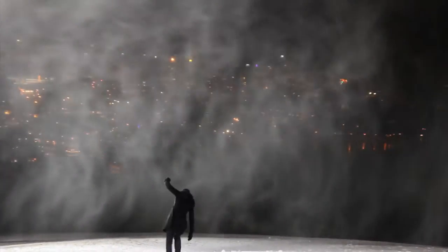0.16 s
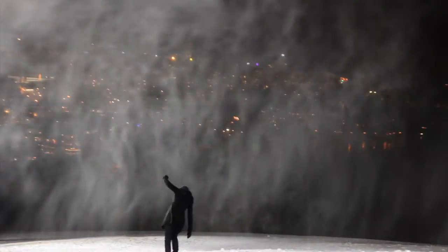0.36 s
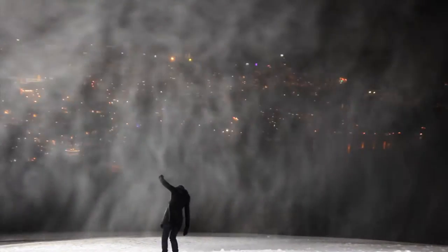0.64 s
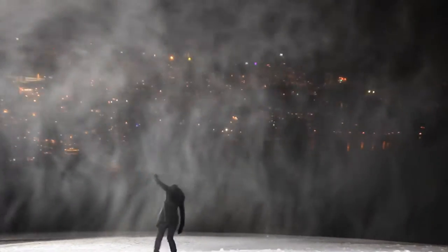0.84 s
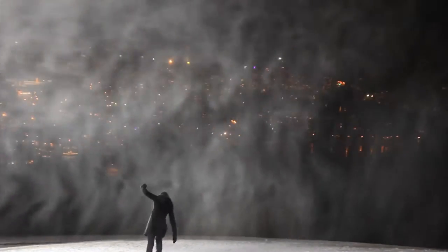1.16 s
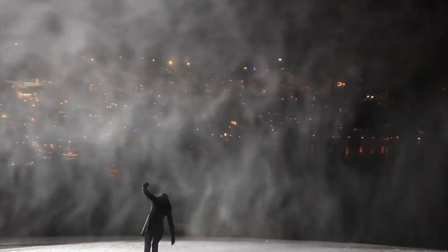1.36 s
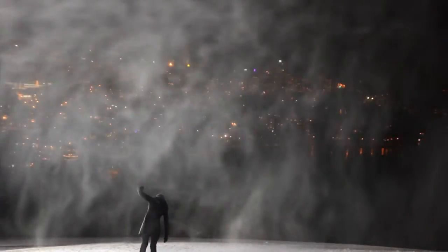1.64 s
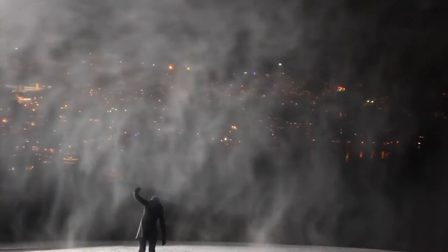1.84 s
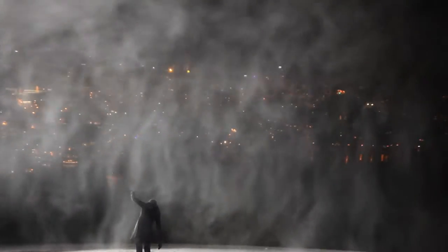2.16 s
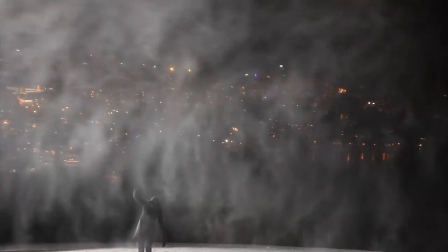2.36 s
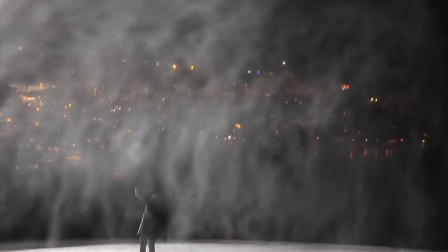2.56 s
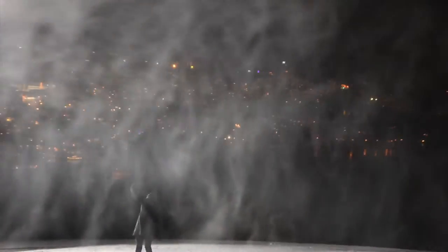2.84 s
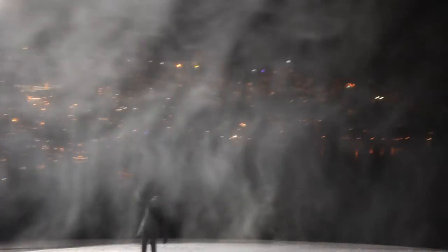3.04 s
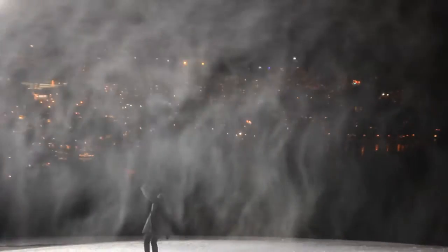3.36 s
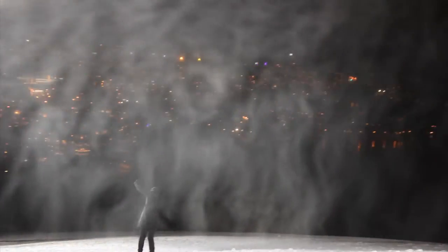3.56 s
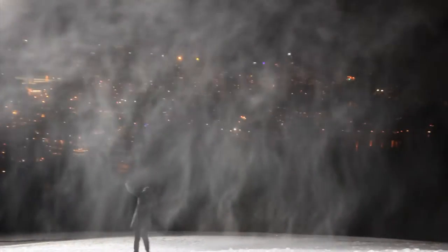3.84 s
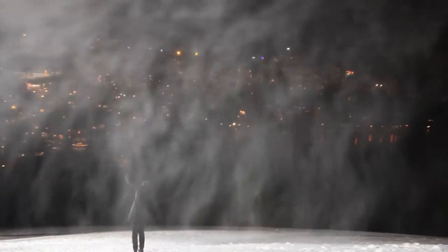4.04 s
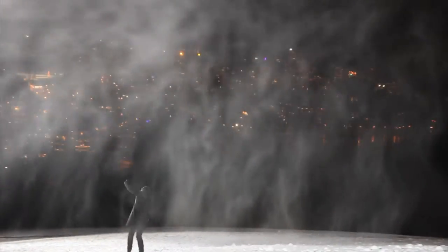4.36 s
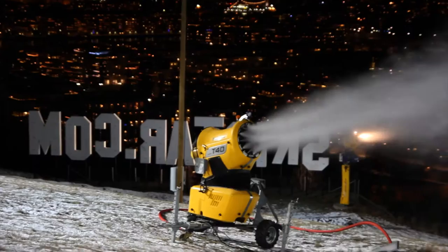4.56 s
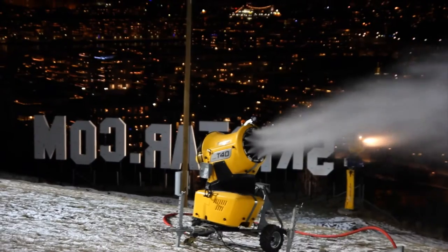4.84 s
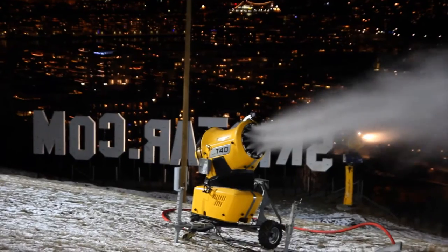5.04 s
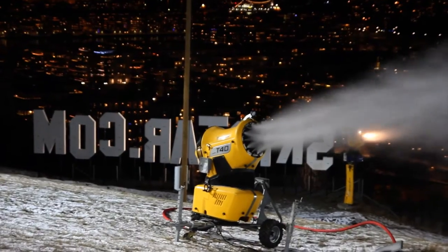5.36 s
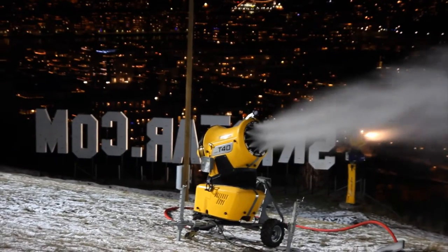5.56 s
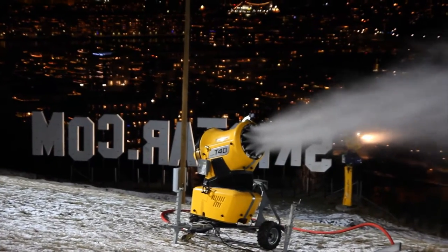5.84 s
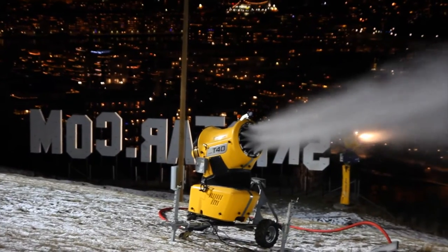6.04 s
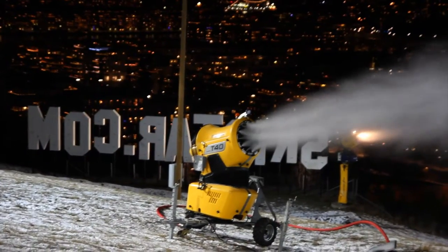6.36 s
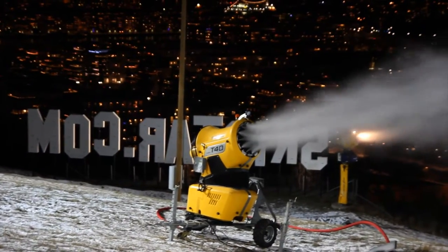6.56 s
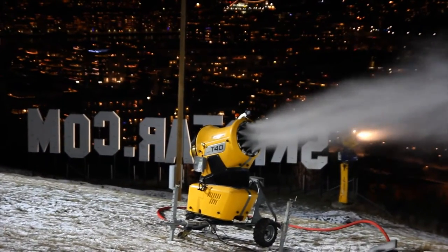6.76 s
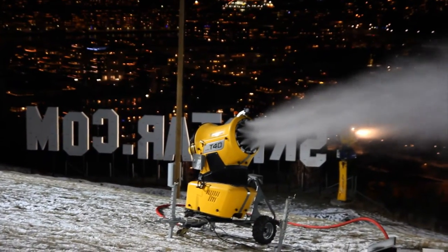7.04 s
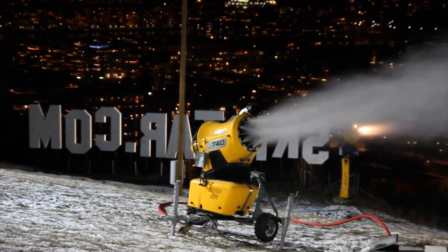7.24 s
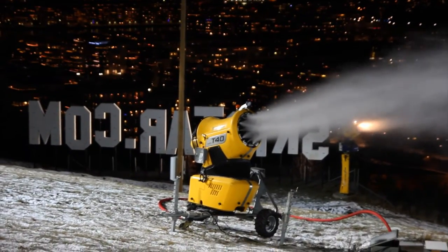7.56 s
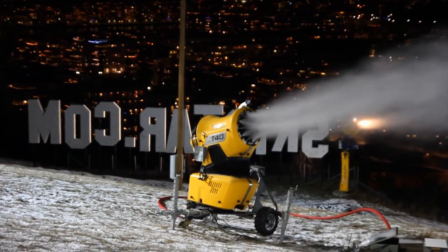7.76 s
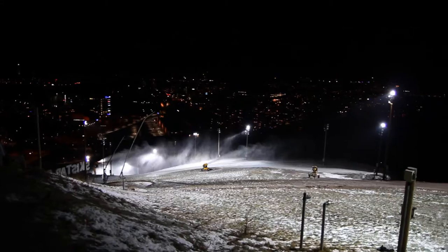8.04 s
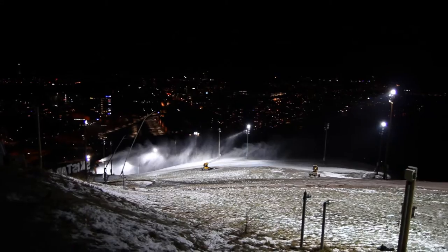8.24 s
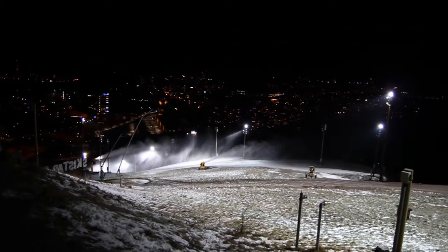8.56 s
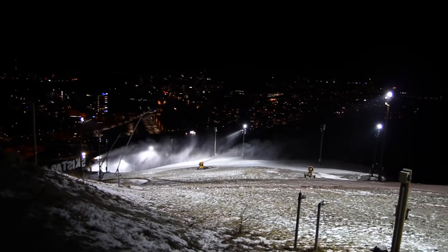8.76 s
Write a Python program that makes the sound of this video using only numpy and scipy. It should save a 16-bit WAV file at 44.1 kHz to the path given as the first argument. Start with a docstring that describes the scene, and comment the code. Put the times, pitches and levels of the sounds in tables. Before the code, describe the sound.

Outdoors at night on a ski slope, the microphone sits inside a snow cannon's plume: dense jet roar, bright nozzle hiss, low fan hum and a soft swelling breeze. Near five seconds it moves beside the cannon, where the spray is quieter and rough gusts slap and overload the microphone. Just after eight seconds it cuts to a distant, wind-free, duller spray with steady fan tones.

```python
"""Snow cannons heard by one microphone: inside the plume, then beside a cannon, then far across the slope.
In the plume, shaped noise makes jet roar and nozzle hiss, sines make two fans and thin hums, a breeze blows.
From 4.62 s this crossfades to the cannon's side, where gusts of noise and sharp slaps buffet the microphone.
At 8.108 s the far place follows at once: duller spray and the fans' blade tones, sheltered from the wind."""
import sys
import numpy as np
from scipy import signal
from scipy.fft import rfft, irfft
from scipy.io import wavfile
from scipy.ndimage import uniform_filter1d

SR = 44100
rng = np.random.default_rng(int(sys.argv[2]) if len(sys.argv) > 2 else 0)


def output_pcm(signal):
    """Save a mono or channel-first signal as 16-bit PCM at the path in sys.argv[1].

    Samples are clipped to [-1, 1] before scaling.
    """
    pcm = np.clip(np.atleast_2d(signal).T, -1, 1) * 32767
    wavfile.write(sys.argv[1], SR, np.round(pcm).astype(np.int16))


N = 392490
SIZE, HOP = 1024, 256  # spectral frame length and step [samples]
HZ = np.fft.rfftfreq(SIZE, 1 / SR)
FRAMES = np.arange(N // HOP + 5) * HOP / SR  # frame times [s]
TIME = np.arange(N) / SR
FADE = (4.62, 5.15)  # start and end of the crossfade from plume to cannon side [s]
JUMP = 8.108  # the far place follows at once [s]


def gain_of(db):
    """Logarithmic level law: decibels to amplitude."""
    return 10 ** (np.asarray(db) / 20)


def evened(x):
    """Normalisation by the root mean square: scales to rms 1."""
    return x / np.sqrt(np.mean(x ** 2) + 1e-20)


def read(points, hz):
    """Spectral interpolation: reads a spectrum on a log-frequency axis."""
    f, value = np.transpose(points)
    return np.interp(np.log(hz + 1), np.log(f + 1), value)


def band_power(gain, lo_hz, hi_hz):
    """Additivity of power: sums a frames x bins magnitude, squared, between two frequencies."""
    inside = (HZ > lo_hz) & (HZ < hi_hz)
    return (gain[:, inside] ** 2).sum(1, keepdims=True)


def grid_chance():
    """Gaussian randomness: an independent draw for every frame and bin."""
    return rng.standard_normal((len(FRAMES), len(HZ)))


def patches(frames, bins):
    """Local averaging: a random field of rms 1, smoothed over neighbouring frames and bins."""
    smooth_in_time = uniform_filter1d(grid_chance(), size=frames, axis=0)
    return evened(uniform_filter1d(smooth_in_time, size=bins, axis=1))


def noise(gain):
    """Overlap-add synthesis: noise whose power is the summed squares of the frames x bins magnitude."""
    spectrum = (grid_chance() + 1j * grid_chance()) * gain
    sound = signal.istft(spectrum.T, nperseg=SIZE, noverlap=SIZE - HOP)[1][:N]
    return sound * np.sqrt(3 / 2)  # overlapping independent frames divide the power by 1.5


def wander(hz):
    """Gaussian low-pass filtering: smooth chance of rms 1 that changes about hz times a second."""
    steps = np.arange(N // 64 + 2) * 64 / SR
    f = np.fft.rfftfreq(len(steps), steps[1])
    spectrum = rfft(rng.standard_normal(len(steps))) * np.exp(-(f / hz) ** 2)
    return np.interp(TIME, steps, evened(irfft(spectrum, len(steps))))


# even low rumble: (frequency [Hz], relative density [dB per Hz])
RUMBLE_SPECTRUM = [(15, -32), (30, -19), (60, -3), (100, 3), (180, -12), (300, -30), (600, -47)]
RUMBLE_DB = (-35, -34.5)  # level at the first two places


def rumble():
    """Stationary random noise: an even low rumble under the wind."""
    level_db = np.interp(TIME, FADE, RUMBLE_DB)
    return evened(noise(gain_of(read(RUMBLE_SPECTRUM, HZ))[None])) * gain_of(level_db)


# swelling and sinking breeze on the microphone inside the plume: (time [s], level [dB])
BREEZE = [(0.0, -29), (0.18, -18.5), (0.71, -23.5), (1.42, -18.5), (1.66, -24.5), (1.76, -20), (3.02, -22),
          (3.13, -35), (3.21, -22), (3.33, -30.5), (3.86, -21.5), (4.04, -30), (4.59, -20), (4.72, -23.5)]
BREEZE_ENDS_S = 4.79
# separate gusts beside the cannon: (start [s], end [s], first level [dB], last level [dB],
# brightness [dB per octave just above the hump of the wind])
GUSTS = [(4.815, 4.985, -24.5, -19, 11), (5.023, 5.07, -19, -20.5, 3), (5.1, 5.398, -21, -16, 12),
         (5.418, 5.557, -19.5, -20.5, 7), (5.586, 5.77, -22.5, -12.5, 4.5), (5.814, 5.937, -22.5, -14, 6),
         (5.944, 6.09, -15.5, -18, 4), (6.17, 6.227, -19, -16, 8), (6.264, 6.276, -14, -12, 5),
         (6.302, 6.426, -14.5, -20, 7.5), (6.43, 6.654, -12, -22, 9), (6.657, 7.003, -17.5, -19, 11.5),
         (7.034, 7.063, -15, -18, 6), (7.091, 7.216, -17, -32, 4), (7.287, 7.32, -16, -9, 6),
         (7.355, 7.378, -19, -22, 1), (7.475, 7.58, -24, -9, 2), (7.633, 7.654, -11.5, -19, 0),
         (7.723, 7.755, -17, -25, 0), (7.811, 7.908, -19, -18.5, 4), (7.93, 7.966, -12, -14, 3),
         (7.982, 8.032, -15, -13, 6.5), (8.076, 8.115, -17, -16.5, 10)]
RISE_S, FALL_S = .01, .014  # edges of a gust
CALM_DB = -27.5  # the air between gusts


def strength(t):
    """Intermittency of turbulence: wind dB of a breeze, then gusts that rise fast, swell or sag, and calm."""
    amp = gain_of(np.interp(t, *np.transpose(BREEZE)))
    amp = amp * np.clip((BREEZE_ENDS_S - t) / FALL_S, 0, 1)
    amp = amp + gain_of(CALM_DB) * (t > BREEZE_ENDS_S - FALL_S)
    for start, end, first_db, last_db, _ in GUSTS:
        edges = np.clip(np.minimum((t - start) / RISE_S, (end - t) / FALL_S) + .5, 0, 1)
        gust = gain_of(np.interp(t, (start, end), (first_db, last_db)))
        amp = np.maximum(amp, edges * gust)
    return 20 * np.log10(amp + 1e-3)


BREEZE_BRIGHT_DB = -3.1  # per octave just above the hump of the wind


def brightness(t):
    """Spectral tilt: dB per octave, dull in the breeze, then gliding from gust to gust."""
    start, end, _, _, bright_db = np.transpose(GUSTS)
    return np.interp(t, [BREEZE_ENDS_S, *(start + end) / 2], [BREEZE_BRIGHT_DB, *bright_db])


# wind before its tilt: (frequency [Hz], relative density [dB per Hz])
WIND_SPECTRUM = [(20, -40), (40, -67), (80, -7.5), (130, 3), (200, 2.5), (280, -3), (400, -12.5),
                 (600, -23), (1000, -22.5), (2000, -44)]
LUMPY_DB = (1.8, 2.8)  # lumpiness at the first two places


def wind_flow():
    """Turbulent pressure fluctuation: low noise in lumps, lopsided towards suction."""
    # the tilt lifts the bands just above the hump, less so higher up
    octaves = np.interp(np.log2((HZ + 1) / 230), (0, 1.3, 2.4), (0, 1.3, .4))
    gain = gain_of(read(WIND_SPECTRUM, HZ) + brightness(FRAMES)[:, None] * octaves)
    flow = noise(gain / np.sqrt(band_power(gain, 60, 450)))
    lumps_db = np.interp(TIME, FADE, LUMPY_DB) * 2 * np.tanh(wander(40) / 2)
    flow = flow * gain_of(lumps_db)
    squared = flow ** 2
    flow = flow - .06 * (squared - uniform_filter1d(squared, size=300))  # lopsided, without a slow offset
    return flow * gain_of(strength(TIME))


# lesser slaps, pairs for the first two places: rate [per s] and width [ms]
SMALL_PER_S, SMALL_MS = (1.5, 16), (1.6, 1.09)
SMALL_OVER_DB, PULL_SHARE = 9, .72  # peak over the wind level [dB], share that pull
SMALL_SPREAD = .3  # largest random departure in width, as a share of it


def small_slaps():
    """Random point process: lesser eddies at chance moments, as strong as the wind that carries them."""
    at, keep, way, width = rng.random((round(max(SMALL_PER_S) * JUMP), 4)).T
    at = .02 + at * (JUMP - .04)
    ms = np.interp(at, FADE, SMALL_MS) * (1 + SMALL_SPREAD * (2 * width - 1))
    peak_db = strength(at) + SMALL_OVER_DB
    rows = np.transpose([at, peak_db, ms, np.where(way < PULL_SHARE, -1, 1)])
    return rows[keep < np.interp(at, FADE, SMALL_PER_S) / max(SMALL_PER_S)]


# the strongest eddies slapping the membrane: (time [s], peak level [dB], width [ms], push 1 or pull -1)
STRONG_SLAPS = [(0.302, -8.4, 1.7, -1), (0.315, -7.9, 1.4, -1), (1.401, -8.3, 1.5, -1),
                (2.271, -8.6, 1.5, 1), (2.427, -8.6, 1.5, -1), (4.483, -9, 2, -1), (4.928, -4.3, 1.4, -1),
                (5.038, -6.7, 1.7, 1), (5.11, -3.4, 1.2, -1), (5.155, -6.6, 1.2, -1), (5.188, -5.7, 1.2, 1),
                (5.247, -7.9, .7, -1), (5.302, -6.5, 1.2, 1), (5.344, -5.8, 1.2, 1), (5.369, -4.5, 1.2, -1),
                (5.437, -6.5, 1.1, -1), (5.538, -5, 1.2, -1), (5.749, -6.1, 1.1, -1), (5.758, -1.8, 1, -1),
                (5.907, -6.6, 1.3, -1), (5.955, -1.7, 1.2, -1), (5.977, -5.3, 1.1, -1),
                (5.997, -3.7, .9, -1), (6.041, -3.1, 1.2, -1), (6.077, -4.5, 1, -1), (6.28, -5.6, 1.2, -1),
                (6.353, -6.1, 1.5, -1), (6.438, -6.2, .8, -1), (6.455, -5.1, 1.2, 1), (6.467, -4.5, .55, 1),
                (6.476, -6, 1.2, 1), (6.492, -6.9, .8, 1), (6.527, -4.1, 1.3, 1), (6.559, -6.5, 1, 1),
                (6.614, -7.1, 1, -1), (6.728, -3.3, 1.2, 1), (6.867, -7.8, .9, -1), (6.912, -6, 1.3, -1),
                (6.921, -5.7, 1, 1), (6.969, -6.8, .8, -1), (6.989, -5.4, 1.1, -1), (7.046, -6.3, 1.2, -1),
                (7.308, -2.1, 1.5, -1), (7.518, -5.9, 1.7, -1), (7.53, -5.7, 1.2, 1),
                (7.563, -3.4, 1.2, -1), (7.644, -6.5, 1, -1), (7.941, -6.8, 1.5, 1), (8.017, -4.7, 1.2, 1),
                (8.026, -2.5, 1.2, -1)]


def wind():
    """Pressure impulses on a membrane: single eddies slap over the turbulent flow and its rumble."""
    out = wind_flow() + rumble()
    for at, peak_db, ms, way in np.concatenate([small_slaps(), STRONG_SLAPS]):
        near = slice(round(at * SR) - 500, round(at * SR) + 500)
        u = (TIME[near] - at) * 1000 / ms
        out[near] *= 1 - .85 * np.exp(-(u / 3.5) ** 2)  # the eddy takes the place of the flow around it
        # a narrow peak inside a wide shallow swing back, of no net push
        pulse = 2 * np.exp(-(u / .8) ** 2) - np.exp(-(u / 1.6) ** 2)
        out[near] += way * gain_of(peak_db) * pulse
    return out


def hum(turns, db, waver_db):
    """Amplitude modulation: a sine whose level wavers as the air carries it."""
    level = np.sqrt(2) * gain_of(db + waver_db * wander(7))
    return level * np.sin(2 * np.pi * (turns + rng.random()))


# other thin hums in the plume: (frequency [Hz], level [dB])
THIN_HUMS = [(258, -37), (1341, -42), (1641, -45), (1696, -43), (2057, -45)]


def thin_hums(waver_db):
    """Superposed sinusoids: fixed frequencies with wavering levels."""
    return sum(hum(hz * TIME, db, waver_db) for hz, db in THIN_HUMS)


BLADE_HZ = (240.2, 243.4)  # blade rates of fan one and fan two, before their drift
# one list per place: (multiple of the blade rate, fan one level [dB], fan two level [dB])
FAN_HUMS = [
    [(2, -60, -45), (3, -42, -60), (4, -37, -40), (5, -44, -60), (6, -42, -43), (7, -49, -55)],
    [(3, -52, -60), (4, -40, -49), (6, -46, -52), (7, -47, -55), (12, -53, -60)],
    [(1, -60, -47), (2, -60, -42), (4, -47, -35), (6, -56, -46), (7, -50, -56), (8, -60, -51),
     (10, -62, -53), (12, -54, -62)],
]


def fans(hums, waver_db):
    """Blade-passing tones: harmonics of two blade rates, each fan's speed drifting a little."""
    blade_turns = [np.cumsum(hz * (1 + .0008 * wander(3))) / SR for hz in BLADE_HZ]
    out = np.zeros(N)
    for multiple, *levels_db in hums:
        for turns, db in zip(blade_turns, levels_db):
            out += hum(multiple * turns, db, waver_db)
    return out


# spray colour at each place, before comb and drift: (frequency [Hz], relative density [dB per Hz])
PLUME = [(250, -15.5), (400, -23.5), (600, -15), (1000, -8.5), (1600, -11), (2300, -12.5), (3400, -16),
         (5000, -17), (7200, -19.5), (8500, -17), (10000, -11.5), (13000, -11), (15700, -12)]
BESIDE = [(410, -26), (700, -10), (982, -4), (1180, -17), (1700, -7.5), (2060, -17), (2380, -17),
          (2610, -12.5), (3340, -16), (3950, -13.5), (6560, -21.5), (8970, -20.5), (15700, -22.5)]
FAR = [(30, -18), (60, -13), (200, -13), (380, -19), (800, -17), (975, -12), (1650, -16), (2900, -25),
       (4200, -30), (4900, -27), (7000, -38), (11800, -47), (13700, -32), (15700, -37)]
# drift of the spray, one list per place: (time [s], nominal roar level [dB], nominal hiss level [dB])
DRIFT = ([(0.0, -19.5, -22), (0.45, -22.5, -26.5), (0.49, -21, -23), (1.15, -21.5, -25), (1.18, -21, -23.5),
          (1.91, -22.5, -25.5), (2.07, -21, -23.5), (2.52, -21.5, -23.5), (2.61, -24.5, -28.5),
          (2.77, -20, -24), (2.94, -21.5, -21), (3.04, -19.5, -26), (3.29, -22.5, -24.5), (3.33, -19, -22),
          (4.04, -22, -24), (4.39, -20.5, -24), (4.56, -20, -23), (4.76, -23.5, -27.5)], [(5.1, -27, -34.5),
          (5.4, -28.5, -36.5), (5.95, -26, -34), (6.07, -30, -38.5), (6.43, -26, -35.5), (6.63, -32, -39.5),
          (6.98, -27, -36), (7.0, -29.5, -36.5), (7.48, -23.5, -31.5), (7.67, -28, -35), (7.87, -23, -30.5),
          (8.08, -27.5, -36)], [(8.12, -28, -45.5), (8.5, -27, -39.5), (8.9, -27.5, -41)])
# bounces off ground and housing, one list per place: (delay [ms], share of amplitude, dull above [Hz])
BOUNCES = [
    [(0.896, 0.3, 6800)],
    [(0.902, 0.056, 4320)],
    [(1.07, 0.092, 6000)],
]
# narrow hollows in the hiss, one list per place: (centre [Hz], width [Hz], depth [dB])
HOLLOWS = ([(11800, 336, -2.1), (12403, 462, -2.1), (14040, 334, -1.9)], [(4307, 293, -2.7),
            (4996, 216, -1.7), (5512, 277, -4.7), (5943, 157, -2.7), (6632, 441, -5.7), (7235, 236, -4.8),
            (7838, 292, -2.3), (8441, 229, -3.9), (9905, 284, -2.1), (11197, 408, -2.4), (11800, 184, -2.1),
            (12489, 316, -5.7), (13351, 657, -2.0), (14556, 317, -2.4), (15100, 250, -4.5)],
            [(4250, 250, -3), (6700, 300, -3), (14300, 300, -3)])


def spray(colour, drift, bounces, hollows, patchy_db, flicker_db, swirl_db):
    """Jet noise and comb filtering: roar and hiss with near bounces, swelling as the plume drifts."""
    time_s, roar_db, hiss_db = np.transpose(drift)
    echoes = 0
    for delay_ms, share, dull_hz in bounces:
        echoes = echoes + share / (1 + (HZ / dull_hz) ** 2) * np.exp(-2j * np.pi * HZ * delay_ms / 1000)
    comb = abs(1 + echoes)
    below_db = 9 * np.minimum(np.log2((HZ + 1) / colour[0][0]), 0)  # rolls off under its lowest band
    hollow_db = sum(db * np.exp(-2.3 * ((HZ - hz) / width) ** 2) for hz, width, db in hollows)
    gain = (gain_of(read(colour, HZ) + below_db + hollow_db) * comb)[None]
    gain = gain / np.sqrt(band_power(gain, 800, 3000))  # the roar's band sets the reference

    hiss_share = np.clip(np.log2((HZ + 1) / 2500) / 2.02, 0, 1)  # share of each band owed to the nozzles
    lift_db = np.interp(FRAMES, time_s, hiss_db - roar_db)[:, None]
    lift_db = lift_db - 10 * np.log10(band_power(gain, 6000, 15500))
    patch = patches(frames=10, bins=24)
    flicker = patches(frames=3, bins=200)  # air eddies make the hiss flicker over wide bands
    swirl = patches(frames=14, bins=70)  # drifting air thins and thickens broad parts of the hiss
    level_db = np.interp(FRAMES, time_s, roar_db)[:, None] + patchy_db * patch
    level_db = level_db + hiss_share * (lift_db + flicker_db * flicker + swirl_db * swirl)
    return noise(gain * gain_of(level_db))


def scene():
    """Superposition: sources add at three places in turn; the far place is sheltered from the wind."""
    fade = np.clip((TIME - FADE[0]) / (FADE[1] - FADE[0]), 0, 1)
    far = np.clip((TIME - JUMP) / .002, 0, 1)
    plume = spray(PLUME, DRIFT[0], BOUNCES[0], HOLLOWS[0], patchy_db=.8, flicker_db=1.1, swirl_db=.6)
    plume = plume + fans(FAN_HUMS[0], waver_db=2.2) + thin_hums(waver_db=3.5)
    beside = spray(BESIDE, DRIFT[1], BOUNCES[1], HOLLOWS[1], patchy_db=.9, flicker_db=.8, swirl_db=.7)
    beside = beside + fans(FAN_HUMS[1], waver_db=2.5)
    distant = spray(FAR, DRIFT[2], BOUNCES[2], HOLLOWS[2], patchy_db=.9, flicker_db=.9, swirl_db=2.2)
    distant = distant + fans(FAN_HUMS[2], waver_db=1.8)
    near = (1 - fade) * plume + np.sqrt(fade) * beside + wind()
    mono = near * (1 - far) + far * distant
    return np.array([mono, mono])


EDGE_HZ = 15730  # upper band limit


def record(dry):
    """Band limiting and saturation: the microphone loses deepest bass, a soft ceiling, then the band limit."""
    bass_cut = signal.butter(N=2, Wn=38, btype="high", fs=SR, output="sos")
    thin = signal.sosfilt(bass_cut, dry)
    held = thin / (1 + np.abs(thin) ** 8) ** (1 / 8)
    band_limit = signal.firwin(2047, EDGE_HZ, window=("kaiser", 10), fs=SR)
    return signal.oaconvolve(held, band_limit[None], "same")


dry = scene()
out = record(dry)
output_pcm(out)
```